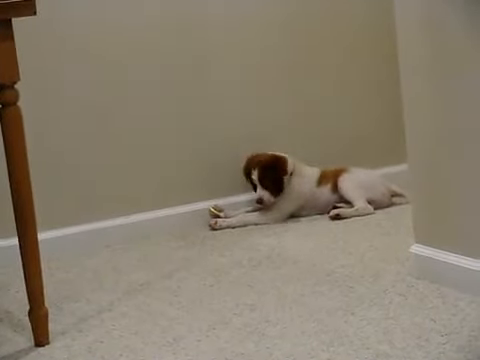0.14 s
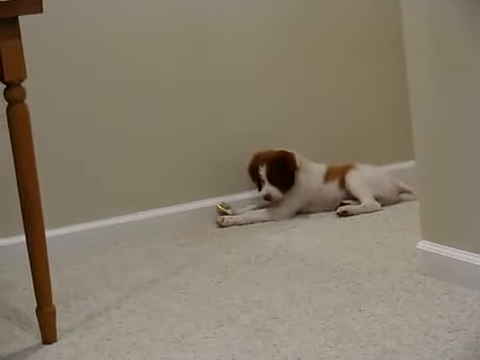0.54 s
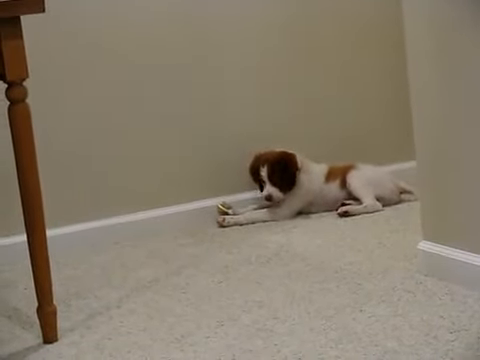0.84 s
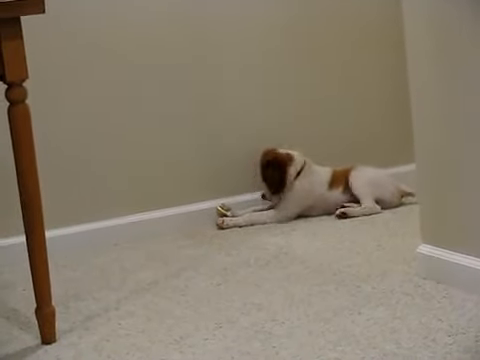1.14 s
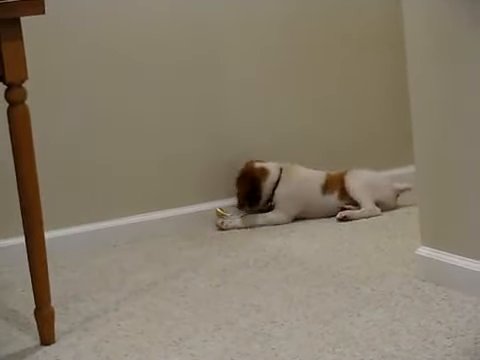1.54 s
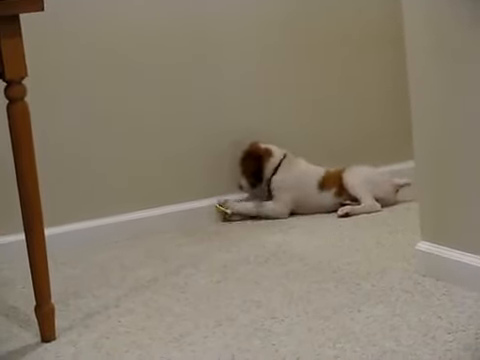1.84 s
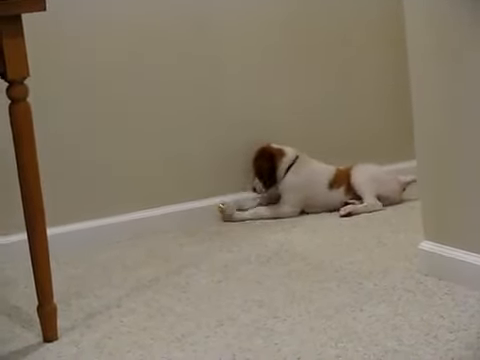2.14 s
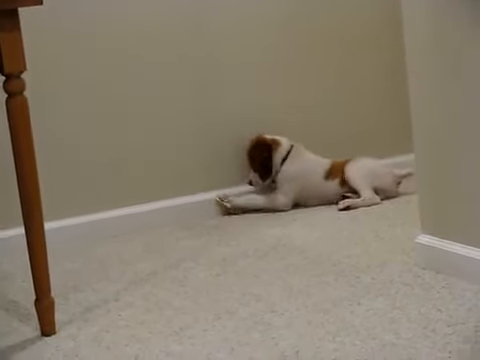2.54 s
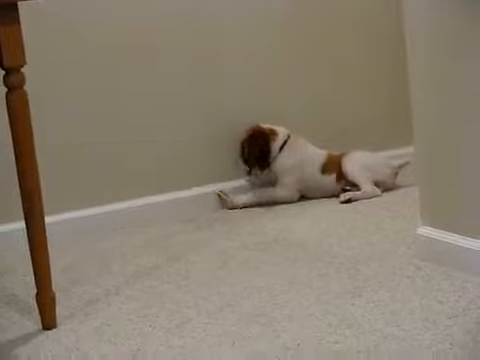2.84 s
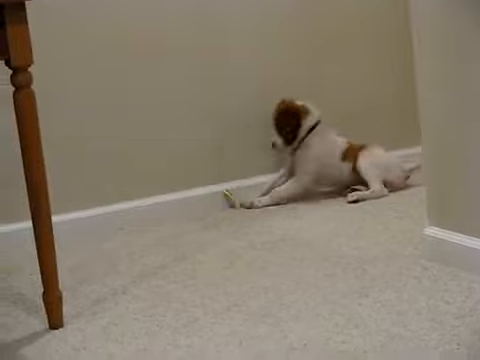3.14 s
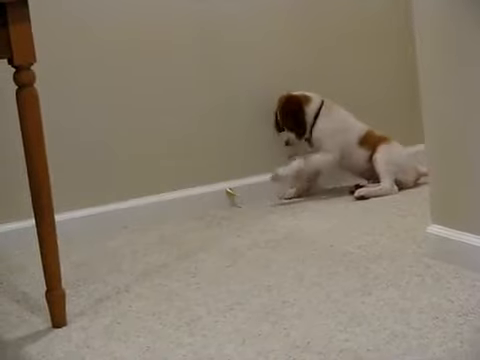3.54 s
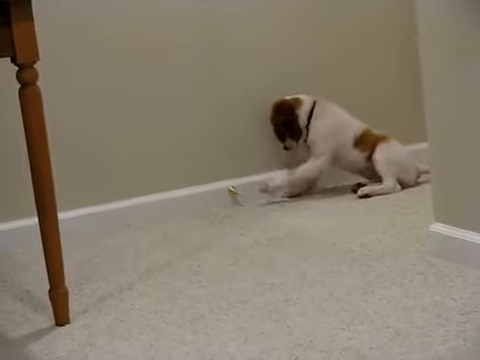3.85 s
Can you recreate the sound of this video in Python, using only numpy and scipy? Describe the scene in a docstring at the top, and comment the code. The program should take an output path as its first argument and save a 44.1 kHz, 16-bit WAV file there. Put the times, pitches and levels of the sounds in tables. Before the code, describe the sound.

A springy door stop twangs three times as a puppy paws it: one brief buzz, then two longer rattling boings with metallic clicks. Soft rustling on carpet comes first, over faint microphone hiss in a quiet room.

```python
"""A coil-spring door stop twangs on a baseboard, pawed by a puppy in a quiet carpeted room.
Once released, the spring oscillates and its coils clash twice a cycle, ever faster as it dies down.
Each clash is an impulse that excites the resonant modes of wire and baseboard. Single hard knocks,
the puppy's rustling and a small recorder's hiss with a thin whistle go with it."""
import sys
import numpy as np
from scipy import signal
from scipy.fft import rfft, irfft
from scipy.io import wavfile
from scipy.ndimage import uniform_filter1d

SR = 44100
rng = np.random.default_rng(int(sys.argv[2]) if len(sys.argv) > 2 else 0)


def pcm_store(signal):
    """Save signal as 16-bit PCM."""
    levels = np.round(np.clip(np.atleast_2d(signal), -1, 1) * 32767)
    wavfile.write(sys.argv[1], SR, levels.astype(np.int16).T)


N = 176400
FFT_SIZE = 2 ** 18
T, FREQ = np.arange(N) / SR, np.arange(FFT_SIZE // 2 + 1) * SR / FFT_SIZE


def spring_twangs(modes, attack_s=.0025, decay_s=.0067, noise_share=.32):
    """Impulse excitation: trains of coil clashes drive the modes, each side with its own clatter."""
    # Each row: start and end in seconds, first half period in seconds, ratio of successive half periods.
    releases = [(1.7456, 1.935, 0.023, 0.97), (2.1823, 2.745, 0.028, 0.96), (3.1111, 3.945, .0351, 0.97)]
    # One list a twang. Each row: time in seconds, then baseboard, middle, wire and treble levels in dB.
    band_levels = [
        [(1.747, -34, -30.5, -41, -36), (1.772, -29.5, -37, -41, -38), (1.795, -32.5, -38.5, -42.5, -37),
         (1.845, -34, -40.5, -40.5, -34), (1.88, -49, -55, -55, -56.5), (1.93, -53, -69, -55, -60)],
        [(2.183, -34.5, -47.5, -31.5, -32), (2.21, -37, -35, -30, -52), (2.265, -37, -38.5, -32, -31),
         (2.315, -35, -30.5, -24, -33.5), (2.39, -27.5, -33, -33.5, -31), (2.48, -34, -33.5, -36, -31),
         (2.575, -32.5, -32, -32, -35.5), (2.66, -45, -49, -47, -45), (2.74, -65, -68, -50.5, -60)],
        [(3.11, -40, -36, -27, -44), (3.17, -39, -37, -28.5, -27.5), (3.25, -35, -33, -24, -39.5),
         (3.32, -39.5, -37.5, -28, -28.5), (3.40, -37, -37.5, -31, -36), (3.46, -33.5, -37, -32, -37),
         (3.53, -35.5, -36, -32.5, -43), (3.58, -36, -38, -39.5, -44), (3.622, -28, -40, -43.5, -46.5),
         (3.66, -41, -40, -49, -43.5), (3.71, -37.5, -43.5, -47.5, -43), (3.82, -44, -53.5, -57.5, -62),
         (3.94, -61.5, -62, -67, -65)],
    ]
    # The edges of those four bands in Hz.
    edges_hz = [135, 460, 1520, 3680, 7100]
    # Spectrum of the spring on its board. Each row: frequency in Hz, relative gain in dB.
    spectrum = [(100, -4.5), (160, 0), (235, 5), (400, -1.5), (900, 1.5), (1400, -3.5), (2300, 3.5),
                (2750, 2), (3300, 1), (3700, -3), (4150, -0.5), (4700, -8), (5200, -16), (6300, -25),
                (7000, -38.5)]
    runs = [oscillation(*row) for row in releases]
    clatters = [contact(attack_s, decay_s) for _ in range(2)]
    loose_clatter = contact(attack_s, decay_s=attack_s)
    spring = modes * minimum_phase(colour(spectrum))
    noise = rng.standard_normal(N)
    pole = np.exp(-2 / (decay_s * SR))
    sound = 0
    for column, (low, high) in enumerate(zip(edges_hz, edges_hz[1:]), start=1):
        bandpass = ((1 + (low / (FREQ + 1)) ** 12) * (1 + (FREQ / high) ** 12)) ** -.5
        band = spring * minimum_phase(bandpass)
        trains = np.zeros((2, N))
        for (times, sizes, side), levels in zip(runs, band_levels):
            for k in range(2):
                trains[k] += impulses(times, sizes * (side == k) * envelope(levels, times, column))
        repeating = sum(filtered(train, band * clatter) for train, clatter in zip(trains, clatters))
        # A noise burst makes every clash a little different, most of all in the treble.
        energy = signal.lfilter([1 - pole], [1, -pole], sum(trains) ** 2 + 1e-18)
        varying = filtered(noise * np.sqrt(energy), band * loose_clatter)
        share = noise_share * high / edges_hz[-1]
        sound += np.sqrt(1 - share) * repeating + np.sqrt(share) * varying
    return sound


def oscillation(start_s, end_s, half_period_s, ratio, shortest_s=.011, asymmetry=.035):
    """Nonlinear oscillation: the time between clashes shortens as the spring loses energy."""
    clash = np.arange(96)
    side = clash % 2
    gaps = np.maximum(half_period_s * ratio ** clash, shortest_s)
    jitter_s = .00025 * rng.standard_normal(len(clash))
    scatter_db = .55 * rng.standard_normal(len(clash))
    times = start_s + np.cumsum(gaps) - gaps - asymmetry * side * gaps + jitter_s
    sizes = np.sqrt(gaps * SR) * amp(scatter_db)
    return times, sizes * (times < end_s), side


def contact(attack_s, decay_s, room_db=0, t60_s=.24, room_onset_s=.0071, carpet_hz=4440):
    """Direct and reverberant sound: coils tick shut in turn, and carpet absorbs the echoes' treble."""
    t = T[:SR // 2]
    ticks, tail = rng.standard_normal((2, len(t)))
    ticks = ticks * (1 - np.exp(-t / attack_s)) * np.exp(-t / decay_s)
    tail = tail * (1 - np.exp(-(t / room_onset_s) ** 2)) * np.exp(-np.log(1000) * t / t60_s)
    tail = signal.sosfilt(signal.butter(2, carpet_hz, fs=SR, output="sos"), tail / np.linalg.norm(tail))
    response = rfft(ticks / np.linalg.norm(ticks) + amp(room_db) * tail, FFT_SIZE)
    smooth_power = uniform_filter1d(abs(response) ** 2, size=700)
    return response * minimum_phase(smooth_power ** -.5)  # evens out the overall spectrum


def board_and_wire_modes():
    """Modal superposition: each resonance of baseboard and wire adds a peak to the response."""
    # Each row: frequency in Hz, bandwidth in Hz, peak lift in dB.
    modes = [(163.4, 8.1, 9.5), (237.2, 30, 9), (300.6, 9.4, 4.5), (332.6, 32, 7), (537.4, 12, 8.5),
             (738.5, 22, 6.5), (905, 10, 7), (1027, 36, 8.5), (1246, 28, 7), (1396, 26, 6.5),
             (1617, 52, 7.5), (1816, 22, 5.5), (2269, 36, 9), (3237, 42, 3)]
    return 1 + sum((amp(db) - 1) / (1 + 2j * (FREQ - hz) / width) for hz, width, db in modes)


def shape_boom(twangs, corner_hz=205):
    """Low shelving: the deepest boom fades from the last twang, so that its boing sits higher."""
    # Each row: time in seconds, bass gain in dB.
    bass_gain = [(1.75, 1), (2.5, 2.5), (3.15, -1.5), (3.45, -5.5), (3.9, -4)]
    bass = irfft(rfft(twangs, FFT_SIZE) / (1 + (FREQ / corner_hz) ** 10))[:N]
    return twangs + bass * (envelope(bass_gain, T) - 1)


def spring_knocks(modes):
    """Impact: a clank of wire, a bright ping, a dry tick and a low thump as of an overloaded microphone."""
    # Each row: time in seconds, then thump, wire, ping and tick levels in dB.
    knocks = [(1.848, -69.5, -51, -34.5, -57), (2.134, -44, -47, -22.5, -39),
              (2.190, -46, -29.5, -21, -32.5), (2.205, -59, -24, -31.5, -34), (2.233, -61, -31.5, -42, -39),
              (2.289, -39, -31, -31.5, -46), (2.310, -37.5, -23.5, -30.5, -39.5),
              (2.338, -50, -30.5, -33.5, -39.5), (2.446, -61.5, -41.5, -38, -44.5),
              (2.486, -67.5, -35, -36, -58), (2.521, -52.5, -28.5, -32.5, -39.5),
              (2.600, -51, -32, -33.5, -42.5), (2.625, -59.5, -43.5, -35.5, -44),
              (2.690, -71, -35.5, -39.5, -50), (2.788, -38.5, -26.5, -22.5, -33.5),
              (2.964, -74.5, -52, -45, -57), (3.111, -38.5, -21.5, -36.5, -38),
              (3.143, -32.5, -25.5, -29, -29.5), (3.208, -44.5, -18, -36, -42),
              (3.244, -50.5, -26.5, -39, -41.5), (3.272, -63, -23.5, -31, -38),
              (3.329, -51, -26.5, -30.5, -35), (3.384, -51, -35.5, -31, -48),
              (3.433, -60, -24, -31.5, -46.5), (3.478, -52.5, -33.5, -33, -52),
              (3.516, -55, -31.5, -43, -46)]
    # Spectra of the four parts. Each row: frequency in Hz, relative gain in dB.
    thump = [(20, -10), (50, 0.5), (110, -8.5), (230, 2), (450, -17), (1200, -34)]
    wire = [(200, -19.5), (900, -15.5), (1700, -5), (2400, 4.5), (2800, -0.5), (3400, 6), (4000, -10),
            (5000, -14.5), (7000, -51)]
    ping = [(1500, -35), (3000, -13), (3450, -11), (3700, -10.5), (4050, -1.5), (4220, 1), (4400, -4.5),
            (4700, -9), (5200, -21), (7000, -46)]
    tick = [(3500, -26), (4600, 2.5), (5400, 2), (5900, -7), (6500, -12), (7000, -24)]
    heavy = dict(attack_s=.0096, decay_s=.0071, room_db=1)
    parts = [(minimum_phase(colour(thump)), heavy),
             (modes * minimum_phase(colour(wire)), heavy),
             (minimum_phase(colour(ping)), dict(attack_s=.0046, decay_s=.0072, room_db=-2.5)),
             (minimum_phase(colour(tick)), dict(attack_s=.0096, decay_s=.004, room_db=-5.5))]
    times, *levels = np.array(knocks).T
    sizes = amp(levels) * np.sqrt(.016 * SR)  # the energy of 16 ms at each level
    sound = 0
    for size, (response, shape) in zip(sizes, parts):
        for k in range(2):  # two clatters alternate
            sound += filtered(impulses(times[k::2], size[k::2]), response * contact(**shape))
    return sound


def puppy_rustle(modes, grain_db=3, grain_hz=125):
    """Friction noise: the body nudges board and spring, while fur and paws scuff the carpet."""
    # Each row: time in seconds, body level in dB, fur level in dB.
    levels = [(0, -79, -72), (1.3, -63.5, -68), (1.42, -61, -47.5), (1.53, -62, -49.5), (1.62, -47, -47.5),
              (1.72, -50.5, -54), (1.97, -48, -56), (2.08, -51, -47), (2.5, -54.5, -54.5),
              (2.87, -48.5, -49.5), (2.94, -54, -67.5), (2.98, -46.5, -43.5), (3.02, -48, -66.5),
              (3.07, -42.5, -52.5), (3.11, -40.5, -46), (3.5, -62, -48), (4, -74, -67)]
    # Spectra of body and fur. Each row: frequency in Hz, relative gain in dB.
    body_spectrum = [(60, -23), (150, -10.5), (230, -2), (450, -0.5), (900, -7), (1600, -9.5), (4000, -35)]
    fur_spectrum = [(500, -16.5), (1500, -8), (2500, -0.5), (3400, -7.5), (4300, 4.5), (5100, -12),
                    (6300, -20), (7000, -39)]
    grain = amp(grain_db * np.interp(T, np.arange(500) / grain_hz, rng.standard_normal(500)))
    body, fur = rng.standard_normal((2, N)) * grain / np.sqrt(np.mean(grain ** 2))
    nudges = filtered(body * envelope(levels, T), modes * colour(body_spectrum))
    scuffs = filtered(fur * envelope(levels, T, column=2), colour(fur_spectrum))
    return nudges + scuffs


def background(whistle_hz=3694, width_hz=98):
    """Filtered noise: a broad band gives hiss and room rumble, a narrow one a thin wavering whistle."""
    # Each row: frequency in Hz, relative gain in dB.
    hiss_spectrum = [(20, 2), (35, -10), (75, 5.5), (125, 2), (175, -0.5), (340, -1.5), (490, -3.5),
                     (610, 3.5), (770, -3.5), (1800, -3.5), (2750, -4), (3250, 1), (4050, -4.5),
                     (4550, 1.5), (5100, -8.5), (6300, -19), (7000, -48.5)]
    # Each row of both: time in seconds, level in dB.
    hiss_levels = [(0, -48.5), (1.7, -48), (3.3, -46), (4, -52)]
    whistle_levels = [(0, -58.5), (.7, -59), (.76, -52), (.95, -68), (1.01, -53), (1.25, -56), (1.6, -54.5),
                      (4, -61)]
    broad, narrow = rng.standard_normal((2, N))
    hiss = filtered(broad, colour(hiss_spectrum))
    whistle = filtered(narrow, 1 / (1 + 1j * (FREQ - whistle_hz) / width_hz) ** 2)
    return hiss * envelope(hiss_levels, T) + whistle * envelope(whistle_levels, T)


def amp(db):
    """The decibel scale: 20 dB is a factor of ten in amplitude."""
    return 10 ** (np.asarray(db) / 20)


def envelope(rows, times, column=1):
    """Amplitude envelope: one dB column of a table, interpolated in time."""
    rows = np.array(rows)
    return amp(np.interp(times, rows[:, 0], rows[:, column]))


def colour(points):
    """Spectral envelope: dB points interpolated over log frequency."""
    hz, db = np.array(points).T
    return amp(np.interp(np.log(FREQ + 1), np.log(hz), db))


def minimum_phase(gain):
    """Causality: the response with this gain that rings only after a blow."""
    cepstrum = irfft(np.log(gain + 1e-6))
    cepstrum[1:FFT_SIZE // 2] *= 2
    return np.exp(rfft(cepstrum[:FFT_SIZE // 2 + 1], FFT_SIZE))


def filtered(x, response):
    """Convolution: x passes through a response scaled to unit energy."""
    return irfft(rfft(x, FFT_SIZE) * response / np.sqrt(np.mean(abs(response) ** 2)))[:N]


def impulses(times, sizes):
    """Impulse train: one click at each time."""
    return np.bincount(np.clip(times * SR, 0, N - 1).astype(int), sizes, N)


def scene():
    """Superposition: all sources add at one microphone."""
    modes = board_and_wire_modes()
    twangs = shape_boom(spring_twangs(modes))
    return (twangs + spring_knocks(modes) + puppy_rustle(modes) + background())[None]


def record(dry):
    """Band limiting: the recorder cuts the top and adds a slight constant offset."""
    cutoff_hz, offset = 6900, -.0062
    return signal.sosfilt(signal.ellip(10, .2, 80, cutoff_hz, fs=SR, output="sos"), dry) + offset


dry = scene()
out = record(dry)
pcm_store(out)
```